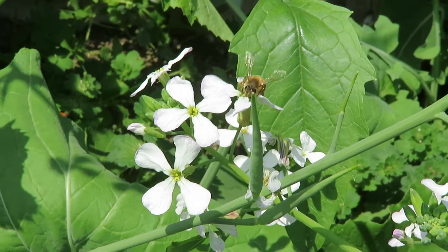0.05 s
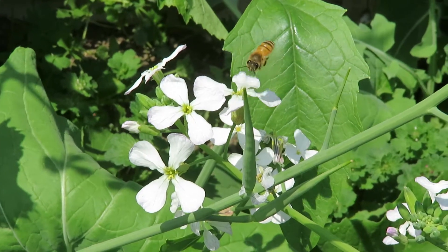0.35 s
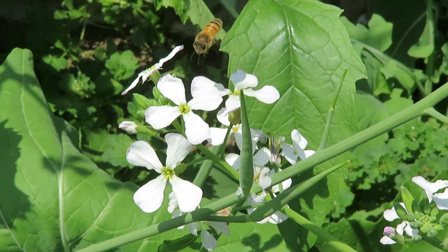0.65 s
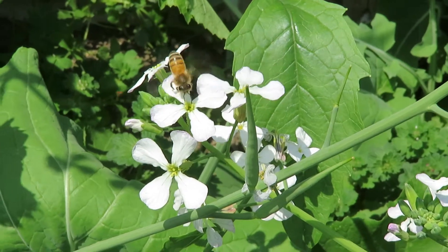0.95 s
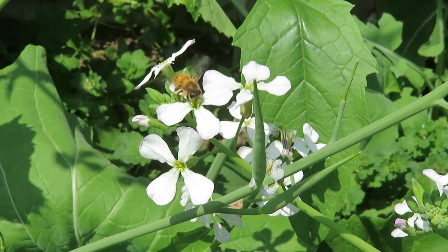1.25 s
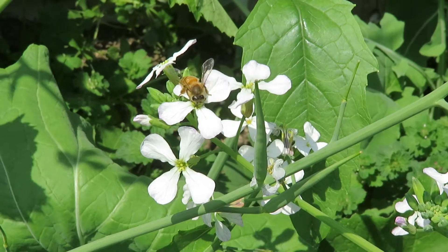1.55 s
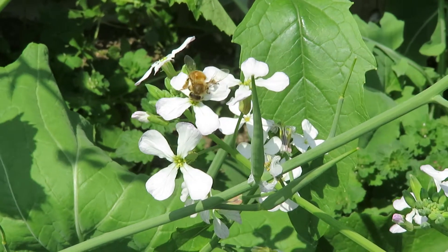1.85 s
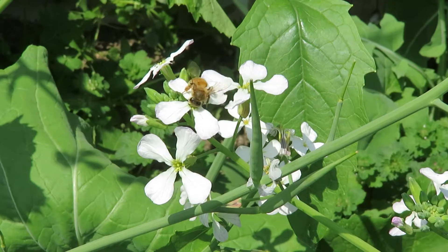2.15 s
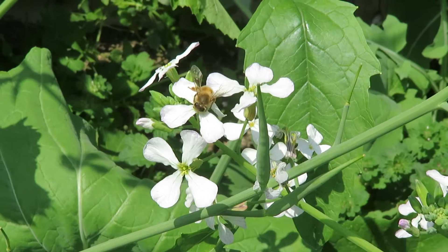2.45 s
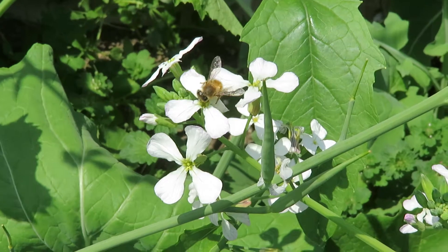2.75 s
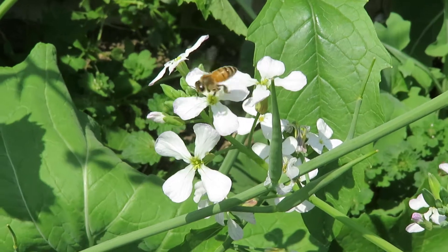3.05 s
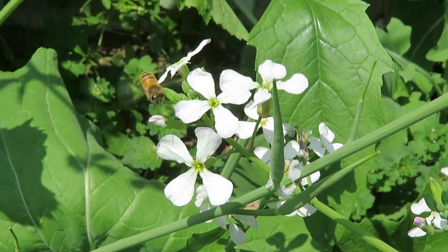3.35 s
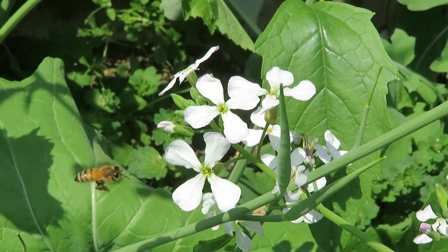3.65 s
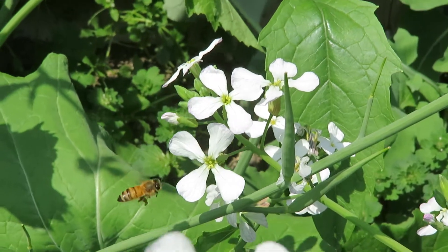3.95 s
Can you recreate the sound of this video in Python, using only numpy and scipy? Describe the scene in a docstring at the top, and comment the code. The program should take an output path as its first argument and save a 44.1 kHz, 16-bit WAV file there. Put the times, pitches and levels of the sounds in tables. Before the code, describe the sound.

A faint honeybee buzz near the microphone stops as the bee lands on a flower, then resumes a little duller as it leaves. Outdoors, distant traffic rumbles throughout, small birds twitter and a second bee hums very faintly.

```python
"""Honeybee among flowers.

A honeybee flies to the next flower, sits silent for nearly two seconds and flies off.
Its wingbeat gives a thin buzz and a pulsing hiss of air. Small birds chirp and trill in the
echoing foliage, over a second bee's faint hum and the steady rumble of distant traffic."""
import sys
import numpy as np
from scipy import signal
from scipy.fft import rfft, irfft
from scipy.io import wavfile

SR = 44100
rng = np.random.default_rng(int(sys.argv[2]) if len(sys.argv) > 2 else 0)


def materialize(psi):
    """Save the field psi as 16-bit PCM at rate SR to the path in sys.argv[1].

    A 1-D psi becomes a single channel; in a 2-D psi each row is a channel.
    """
    bounded = np.clip(np.atleast_2d(psi).T, -1, 1)
    quanta = np.round(bounded * 32767).astype(np.int16)
    wavfile.write(sys.argv[1], SR, quanta)


N = 176400
T = np.arange(N) / SR


def from_db(db):
    """Decibels to gain."""
    return 10 ** (np.asarray(db) / 20)


def unit_rms(x):
    """Scale to unit power."""
    return x / np.sqrt(np.mean(x ** 2) + 1e-20)


def at_hz(points, hz):
    """Read a spectrum table on a log-frequency axis."""
    f, value = np.transpose(points)
    return np.interp(np.log(np.maximum(hz, 1)), np.log(f), value)


def drift(rate_hz):
    """Smooth random wander, unit RMS."""
    pole = np.exp(-2 * np.pi * rate_hz / SR)
    return unit_rms(signal.lfilter([1], [1, -2 * pole, pole * pole], rng.standard_normal(N + SR))[SR:])


def coloured(x, spectrum):
    """Filter by a spectrum table."""
    return irfft(rfft(x) * from_db(at_hz(spectrum, np.arange(N // 2 + 1) * SR / N)), N)


def noise(spectrum):
    """Coloured noise, unit RMS."""
    return unit_rms(coloured(rng.standard_normal(N), spectrum))


def filtered(x, order, edge_hz, kind="low"):
    """Maximally flat filter, low-pass by default."""
    return signal.sosfilt(signal.butter(order, edge_hz, kind, fs=SR, output="sos"), x)


def placed(x, pan_db=0, lead_s=0):
    """Mono to stereo; positive values make the left louder and earlier."""
    hz = np.arange(N // 2 + 1) * SR / N
    late = irfft(rfft(x) * np.exp(-2j * np.pi * hz * lead_s), N)
    return np.array([x * from_db(pan_db / 2), late * from_db(-pan_db / 2)])


def phase_rad(hz):
    """Running phase of a changing frequency."""
    return 2 * np.pi * np.cumsum(hz) / SR


def add(track, start_s, sound):
    """Mix a sound into a track."""
    i = max(int(start_s * SR), 0)
    track[i:i + len(sound)] += sound[:max(N - i, 0)]


def excerpt(x, start_s, samples):
    """Slice of a signal, wrapping at its end."""
    return np.roll(x, -int(start_s * SR))[:samples]


# Rumble spectrum: (frequency [Hz], relative density [dB])
TRAFFIC_SPECTRUM = [(20, -14), (33, -16), (43, 3.5), (52, 0.5), (85, 0), (108, -4), (135, 0), (170, -7.5),
                    (240, -7.5), (305, -2.5), (338, -6), (378, -5), (450, -16.5), (560, -14.5), (720, -14),
                    (810, -19), (900, -28), (1150, -25.5), (1400, -30.5), (1850, -30), (2400, -41),
                    (3600, -40.5), (4800, -46), (6000, -46.5), (8000, -51.5), (11000, -60), (16000, -64)]
# Stereo width: (frequency [Hz], side minus mid [dB])
TRAFFIC_WIDTH = [(40, -60), (90, -61), (180, -27), (350, -19.5), (700, -15), (1400, -5), (3000, -0.5),
                 (8000, 1.5)]
# Stereo balance: (frequency [Hz], left gain [dB])
TRAFFIC_BALANCE = [(170, 0), (330, -.7), (700, -.5), (1300, .1), (2500, 1.5), (7000, 0)]
# Low-mid swell: (time [s], gain [dB])
TRAFFIC_SWELL = [(0, -2.5), (.8, -2), (1.7, 1.5), (2.8, 0.5), (4, -1)]


def traffic(level_db=-33.5, swell_band_hz=(146, 286)):
    """Distant rumble, swelling slightly; centred in the bass, diffuse in the treble."""
    side = coloured(noise(TRAFFIC_SPECTRUM), TRAFFIC_WIDTH)
    mid = noise(TRAFFIC_SPECTRUM)
    swell = from_db(np.interp(T, *np.transpose(TRAFFIC_SWELL)))
    mid = mid + (swell - 1) * filtered(mid, 1, swell_band_hz, "band")
    left, right = placed(mid, lead_s=30e-6)
    return from_db(level_db) * np.array([coloured(left + side, TRAFFIC_BALANCE), right - side])


# Buzz spectrum, both bees: (frequency [Hz], relative level [dB])
BUZZ_SPECTRUM = [(260, -54), (525, -52.5), (790, -63), (1050, -60), (1310, -62.5), (1570, -58.5),
                 (1835, -66), (2100, -64), (2360, -60), (2620, -63), (2880, -60), (3150, -69),
                 (4200, -76.5), (6000, -83)]


def wing_buzz(beat_rad, mean_hz, flicker_db=2.4):
    """Wingbeat harmonics, each flickering as the bee turns."""
    out = np.zeros(N)
    for k in range(1, 20):
        rms = from_db(at_hz(BUZZ_SPECTRUM, k * mean_hz) + flicker_db * drift(8.5))
        out += np.sqrt(2) * rms * np.sin(k * beat_rad + rng.uniform(0, 2 * np.pi))
    return out


def far_bee(wingbeat_hz=264.8, wander=.015, cutoff_hz=2200, gain_db=-10):
    """Faint, dull wing hum among farther flowers."""
    beat_rad = phase_rad(wingbeat_hz * (1 + wander * drift(3.06)))
    return from_db(gain_db) * filtered(wing_buzz(beat_rad, wingbeat_hz), 2, cutoff_hz)


def scatter(x, t60_s=.35, gap_s=.003):
    """Short diffuse echo from leaves and walls."""
    t = T[:SR // 2]
    tails = rng.standard_normal((2, len(t))) * from_db(-60 * t / t60_s) * (t > gap_s)
    tails /= np.sqrt(np.sum(tails ** 2, axis=1, keepdims=True))
    return signal.fftconvolve(x[None], tails, axes=1)[:, :N]


BIRD_LEAD_S = 50e-6


def in_foliage(x, echo_db, pan_db=0):
    """A bird's direct sound plus its scatter."""
    return placed(x, pan_db, BIRD_LEAD_S) + from_db(echo_db) * scatter(x)


def twitter(notes_per_s=110, centre_hz=3700, note_s=.0298, gain_db=-66):
    """Faintest birds: brief glides at random times and pitches."""
    out, u = np.zeros(N), np.linspace(0, 1, int(note_s * SR))
    for when, pitch, glide, strength in rng.random((int(notes_per_s * N / SR), 4)):
        octaves = .8 * (pitch - .5) + (glide - .5) * (u - .5)
        envelope = from_db(gain_db) * (.5 + strength) * np.sin(np.pi * u)
        add(out, when * N / SR, envelope * np.sin(phase_rad(centre_hz * 2 ** octaves)))
    return in_foliage(out, echo_db=-1.5)


# Slurred notes: (start [s], length [s], first pitch [Hz], last pitch [Hz], level [dB])
SLURS = [(.002, 0.007, 3940, 4480, -38.5), (0.115, 0.0362, 4164, 3420, -42),
         (0.211, 0.047, 4980, 4230, -45), (0.269, 0.014, 3590, 4020, -43), (0.29, 0.016, 3150, 3460, -49),
         (0.321, 0.056, 3870, 4050, -46), (0.361, 0.032, 3900, 3050, -44.5), (0.445, .055, 4700, 4630, -50),
         (0.497, 0.01, 3600, 4030, -42.5), (0.545, 0.014, 3620, 4080, -44),
         (0.559, 0.051, 4090, 3450, -45.5), (1.023, 0.048, 4410, 3460, -46),
         (1.074, 0.015, 5490, 5700, -50.5), (1.08, 0.059, 3630, 2920, -49),
         (1.122, 0.078, 3930, 3510, -44.5), (1.251, 0.055, 4870, 4500, -48),
         (1.297, 0.021, 3650, 4720, -44), (1.33, 0.097, 4180, 3410, -48.5), (1.629, 0.039, 4950, 4300, -56),
         (1.623, 0.1, 3590, 3370, -57.5), (1.747, 0.042, 5130, 4760, -54.5),
         (1.79, 0.09, 3640, 3550, -52.5), (1.848, 0.019, 4630, 5060, -50), (1.879, 0.05, 3600, 3220, -53.5),
         (2.01, 0.0141, 3380, 4520, -43.5), (2.026, 0.019, 3060, 3770, -48),
         (2.039, 0.058, 3150, 2850, -53), (2.116, 0.091, 2870, 2770, -58.5),
         (2.142, 0.022, 5300, 6800, -56.5), (2.356, 0.043, 5600, 4680, -57.5),
         (2.39, 0.029, 3480, 4320, -50.5), (2.43, .14, 3520, 3500, -63), (2.729, 0.015, 3260, 4260, -51),
         (2.755, 0.013, 3240, 3620, -50), (2.81, 0.017, 3400, 3680, -53), (3.068, 0.071, 4310, 4070, -47.5),
         (3.985, 0.021, 4330, 4650, -48.5)]


def slurs(flicks_per_s=70, flick_depth=.04, roughness=.036):
    """Farther birds: scratchy glides broken by quick upward flicks."""
    out, jitter = np.zeros(N), roughness * drift(223)
    for start_s, length_s, first_hz, last_hz, db in SLURS:
        u = np.linspace(0, 1, int(length_s * SR))
        flicks = flick_depth * signal.sawtooth(2 * np.pi * flicks_per_s * length_s * u, width=.25)
        hz = (first_hz + (last_hz - first_hz) * u) * (1 + flicks + excerpt(jitter, start_s, len(u)))
        add(out, start_s, from_db(db) * np.sin(np.pi * u) * np.sin(phase_rad(hz)))
    return in_foliage(out, echo_db=-1.5)


# Trill runs: (start [s], length [s], first pitch [Hz], last pitch [Hz], flick rate [1/s],
# level [dB], direct gain [dB])
TRILLS = [(2.041, 0.12, 4530, 4800, 70, -55.5, -5), (2.162, 0.14, 4850, 4600, 56, -56.5, 0.5),
          (2.515, 0.12, 3900, 3940, 76, -56.5, 2.5), (2.713, 0.15, 5000, 4570, 30, -46, -4),
          (2.827, 0.25, 4910, 4620, 49, -49, -0.5), (3.422, 0.064, 4130, 4200, 80, -41, -2),
          (3.622, 0.062, 4330, 4200, 86, -42.5, 2.5), (3.831, 0.055, 4460, 4290, 74, -44.5, 2.5)]


def trills(flick_span_hz=950, lower_ratio=.85, lower_db=-6, echo_db=-2):
    """Two-voiced runs of swelling upward flicks; hidden birds are mostly echo."""
    sung, direct = np.zeros(N), np.zeros(N)
    waver = .023 * drift(190) + .02 * drift(27.5)  # pitch roughness + wander
    pace = 1 + .1 * drift(25)
    for start_s, length_s, first_hz, last_hz, flicks_per_s, db, direct_db in TRILLS:
        t = T[:int(length_s * SR)]
        flick = np.cumsum(flicks_per_s * excerpt(pace, start_s, len(t))) / SR % 1
        hz = first_hz + (last_hz - first_hz) * t / length_s + flick_span_hz * (flick - .5)
        phase = phase_rad(hz * (1 + excerpt(waver, start_s, len(t))))
        voices = np.sin(phase) + from_db(lower_db) * np.sin(lower_ratio * phase)
        run = from_db(db) * signal.windows.tukey(len(t), .35) * np.sin(np.pi * flick) ** 2 * voices
        add(sung, start_s, run)
        add(direct, start_s, from_db(direct_db) * run)
    return placed(direct, pan_db=.7, lead_s=BIRD_LEAD_S) + from_db(echo_db) * scatter(sung)


# Chips leading into trills: (start [s], length [s], first pitch [Hz], last pitch [Hz], level [dB])
CHIPS = [(3.363, .015, 4500, 5370, -50), (3.376, 0.018, 3500, 4540, -44), (3.569, 0.013, 4620, 5450, -47),
         (3.583, .021, 3700, 5230, -40), (3.784, .016, 4060, 5400, -40.5), (3.795, 0.011, 4750, 5200, -45)]


def chips():
    """Clean, quick upsweeps from a bird in the open."""
    out = np.zeros(N)
    for start_s, length_s, first_hz, last_hz, db in CHIPS:
        u = np.linspace(0, 1, int(length_s * SR))
        hz = first_hz + (last_hz - first_hz) * u
        add(out, start_s, from_db(db) * np.sin(np.pi * u) ** 2 * np.sin(phase_rad(hz)))
    return in_foliage(out, echo_db=-8.5)


# Chirp contour, unstretched: (time from onset [s], pitch [Hz], relative level [dB])
CHIRP_CONTOUR = [(0, 4160, -17.5), (.01, 4530, -8.5), (.016, 5545, -12.5), (0.024, 5820, -11.5),
                 (.028, 5500, -15), (.031, 4290, 2.5), (.035, 4460, -8), (0.038, 5000, -9),
                 (0.041, 3670, -4), (.048, 4616, -14), (.055, 3765, -3), (0.059, 3576, -6),
                 (.067, 3704, 1.5), (.072, 4595, -9.5), (0.075, 3650, -5), (0.081, 3334, -6.5),
                 (0.09, 3130, -15)]
# Near bird's calls: (start [s], gain [dB], time stretch [ratio], echo gain [dB])
CHIRPS = [(.012, -32.5, 1.04, -2), (1.399, -29.5, 1.02, -7.5), (3.11, -30, 1.0, -8)]


def near_bird(upper_ratio=1.33, upper_db=-11.5, bounce_s=.009, bounce_db=-10, cutoff_hz=6800):
    """Harsh chirps that leap up and tumble down, with a weaker upper voice and one ground bounce."""
    out = np.zeros((2, N))
    pitch_jitter, rasp = 1 + .04 * drift(600), 1 + .22 * drift(700)
    times_s, hz, db = np.transpose(CHIRP_CONTOUR)
    for start_s, gain_db, stretch, echo_db in CHIRPS:
        t = T[:int(times_s[-1] * stretch * SR)] / stretch
        phase = phase_rad(np.interp(t, times_s, hz) * excerpt(pitch_jitter, start_s, len(t)))
        voices = np.sin(phase) + from_db(upper_db) * np.sin(upper_ratio * phase)
        envelope = from_db(gain_db + np.interp(t, times_s, db)) * signal.windows.tukey(len(t), .1)
        chirp = voices * excerpt(rasp, start_s, len(t)) * envelope
        call = np.zeros(N)
        add(call, start_s, chirp)
        add(call, start_s + bounce_s, from_db(bounce_db) * chirp)
        out += in_foliage(call, echo_db, pan_db=3.5)
    return filtered(out, 8, cutoff_hz)


# Flight envelopes, arrival then departure: (time [s], gain [dB])
FLIGHTS = [
    [(0.26, -21), (0.335, -5.5), (0.5, -5.5), (0.62, -4), (0.69, -4.8), (0.8, -3), (0.91, -4.5), (1.07, -5),
     (1.19, -15), (1.37, -14.5)],
    [(3.05, -16), (3.13, -1.5), (3.25, -4), (3.36, -2.5), (3.45, -3), (3.54, -4), (3.63, -5.5), (3.7, -5),
     (3.86, -4.5), (4.0, -6.5)],
]
# Wingbeat: (time [s], rate [Hz])
WINGBEAT = [(.3, 258), (.42, 260), (.55, 268), (.62, 265), (.78, 269), (.9, 272), (1.03, 267), (1.15, 250),
            (3.1, 259), (3.22, 254), (3.33, 259), (3.46, 262), (3.65, 258), (3.8, 258), (4, 263)]
# Stroke rasp: (frequency [Hz], relative density [dB])
RASP_SPECTRUM = [(1200, -31), (2100, 4), (2450, 5.5), (3000, -3), (3500, -9), (5000, -13)]
# Air torn by the wings: (frequency [Hz], relative density [dB])
AIR_SPECTRUM = [(800, -7), (2000, 10), (3200, 11), (5000, 0.5), (7000, -5), (9500, -2.5), (13000, 0),
                (14500, -3.5), (16000, -17)]


def near_bee(buzz_db=2.2, rasp_db=-58.5, air_db=-54.5, flutter_db=2, air_width=.27, fade_s=.014):
    """Uneven buzz with a rasp and a puff of hiss per stroke; silent at rest, duller heading away."""
    arrival, departure = FLIGHTS
    enter_s, land_s, takeoff_s = arrival[0][0], arrival[-1][0], departure[0][0]
    resting_s = np.minimum(T - land_s, takeoff_s - T)
    flying = np.clip(1 - np.maximum(resting_s, enter_s - T) / fade_s, 0, 1)
    envelope = flying * from_db(np.interp(T, *np.transpose(arrival + departure)))
    leaving = T > (land_s + takeoff_s) / 2

    hz = np.interp(T, *np.transpose(WINGBEAT))
    wobble = np.where(leaving, .01, .003) * drift(30.1)
    jitter_rad = .03 * drift(170)
    beat_rad = phase_rad(hz * (1 + wobble)) + jitter_rad

    buzz = from_db(buzz_db) * wing_buzz(beat_rad, hz.mean())
    bursts = unit_rms(np.exp(1.6 * np.cos(beat_rad)))
    buzz += from_db(rasp_db) * bursts * noise(RASP_SPECTRUM)
    buzz = np.where(leaving, filtered(buzz, 1, edge_hz=2580), buzz)

    puffs = unit_rms(np.exp(.26 * np.cos(beat_rad))) * from_db(air_db + flutter_db * drift(23))
    mid, side = noise(AIR_SPECTRUM), air_width * noise(AIR_SPECTRUM)
    air = puffs * np.array([mid + side, mid - side])
    return envelope * (placed(buzz, pan_db=1.8) + air)


def scene():
    """The flower bed, in stereo."""
    return traffic() + near_bee() + far_bee() + near_bird() + slurs() + chips() + trills() + twitter()


def record(dry):
    """Short fade-in, steep treble cut."""
    fade_s, cutoff_hz = .004, 15400
    lowpass = signal.ellip(10, .1, 80, cutoff_hz, fs=SR, output="sos")
    return signal.sosfilt(lowpass, dry * np.minimum(T / fade_s, 1))


dry = scene()
out = record(dry)
materialize(out)
```